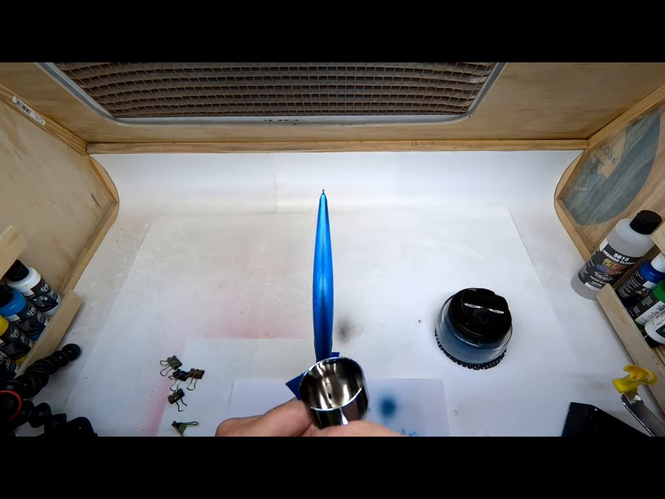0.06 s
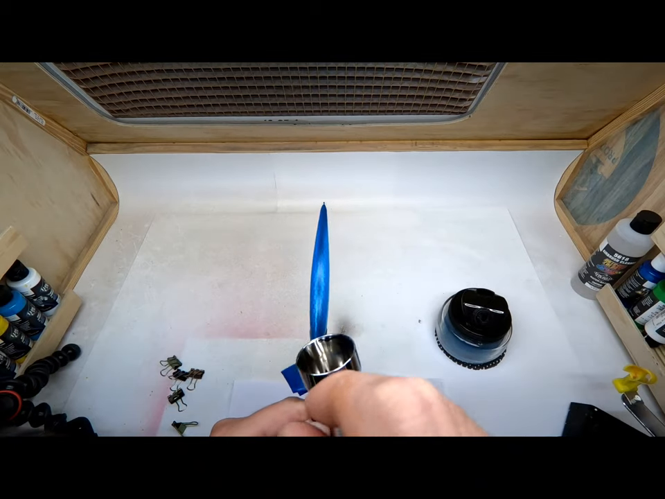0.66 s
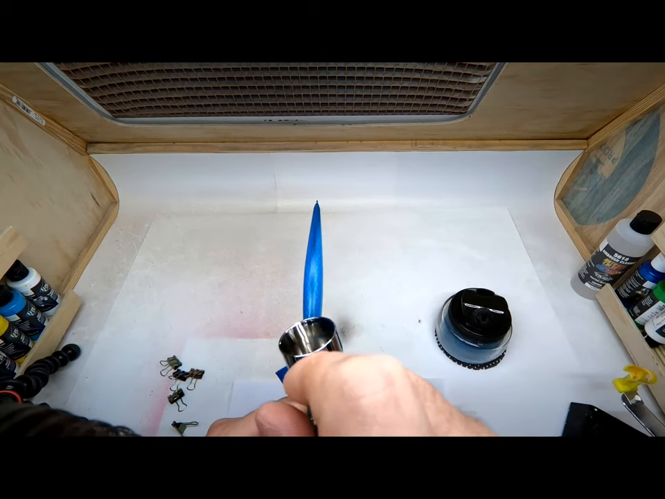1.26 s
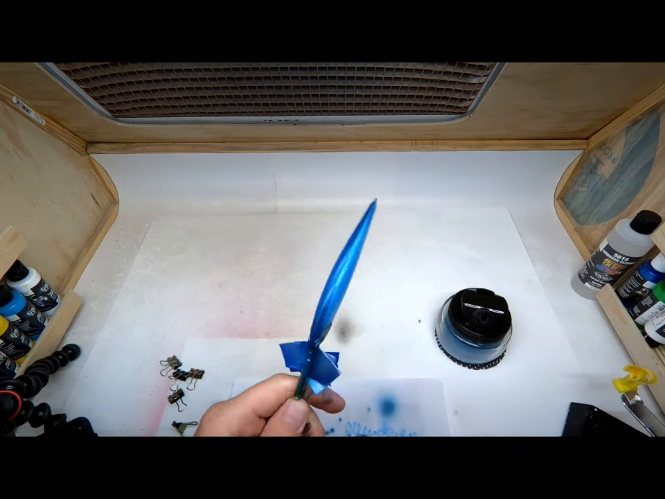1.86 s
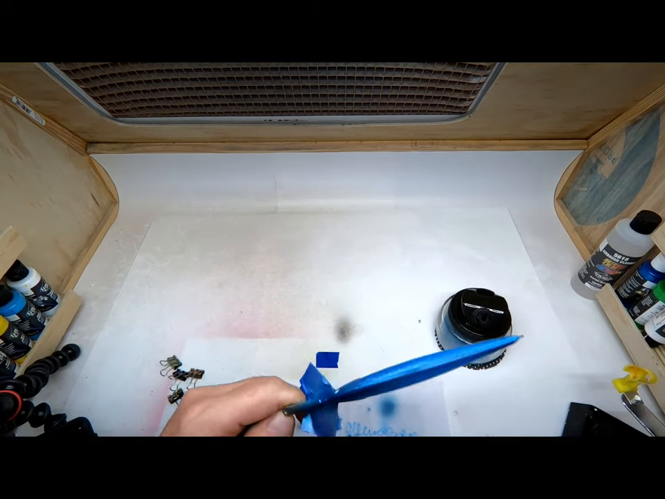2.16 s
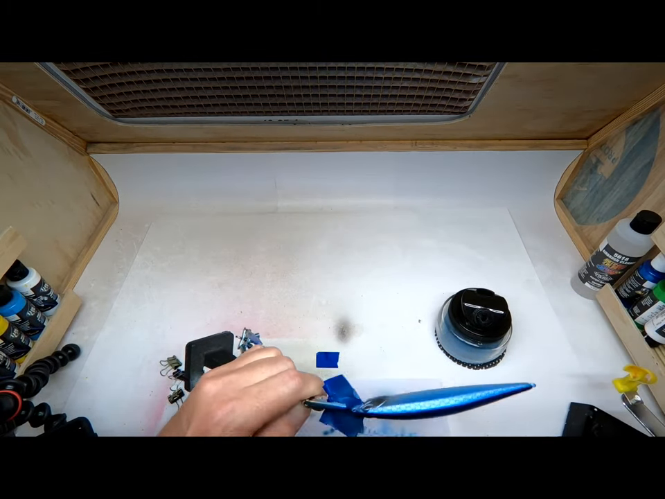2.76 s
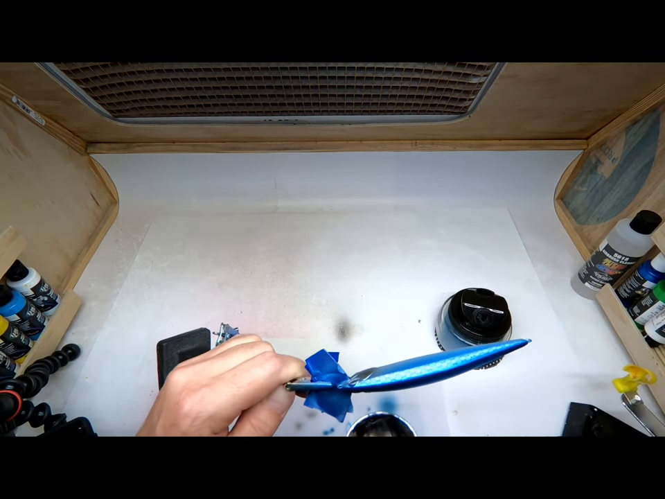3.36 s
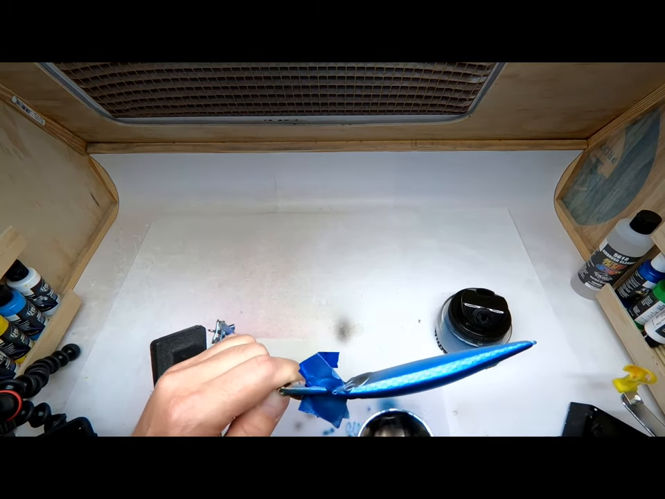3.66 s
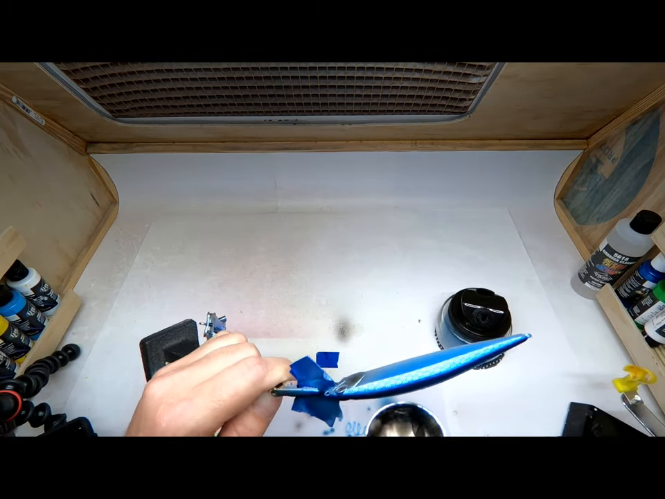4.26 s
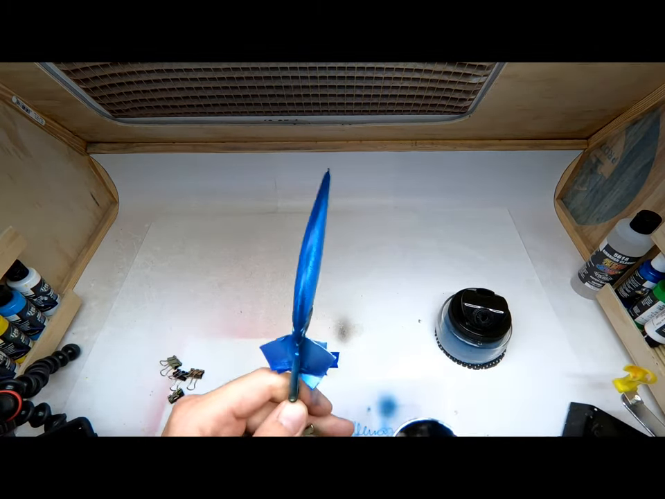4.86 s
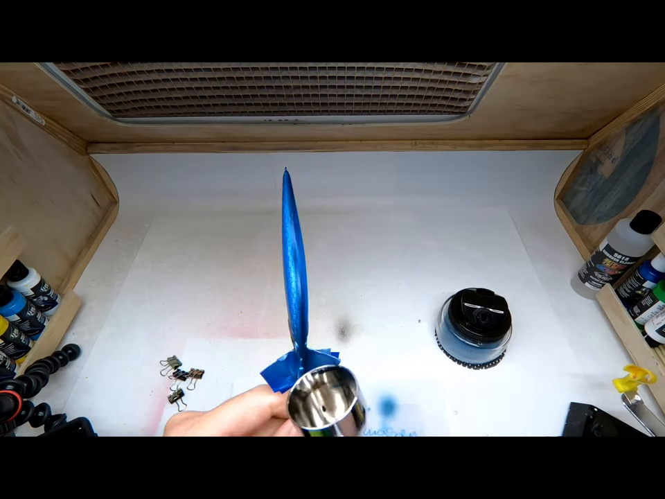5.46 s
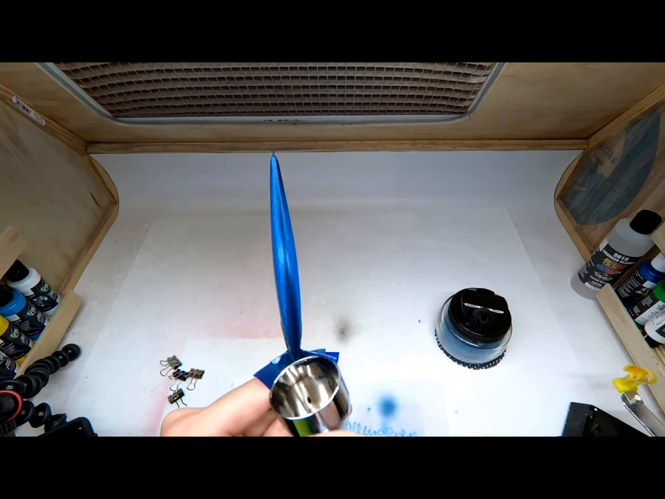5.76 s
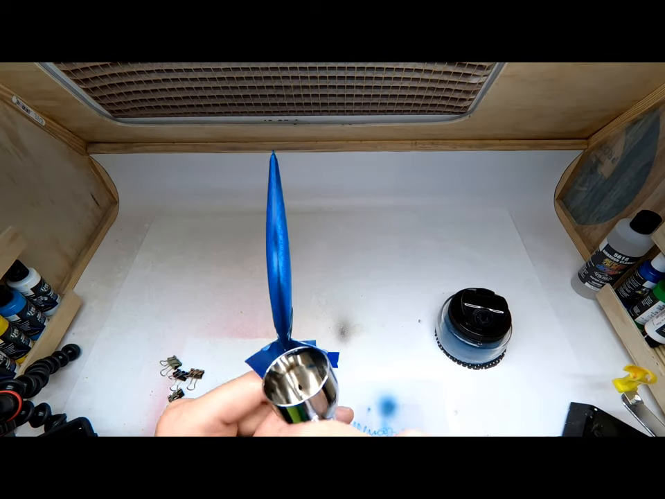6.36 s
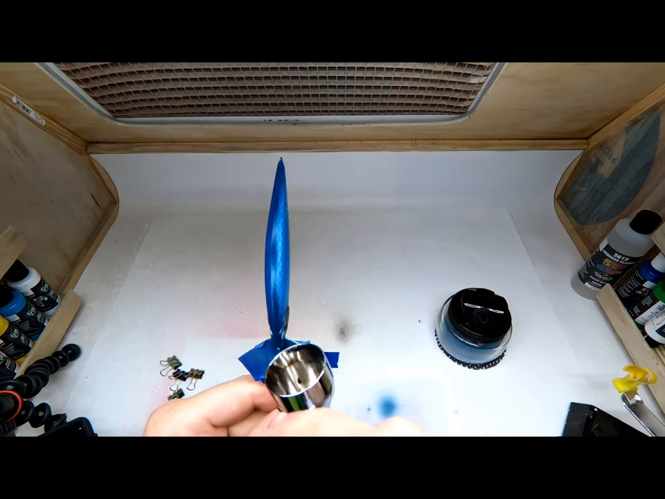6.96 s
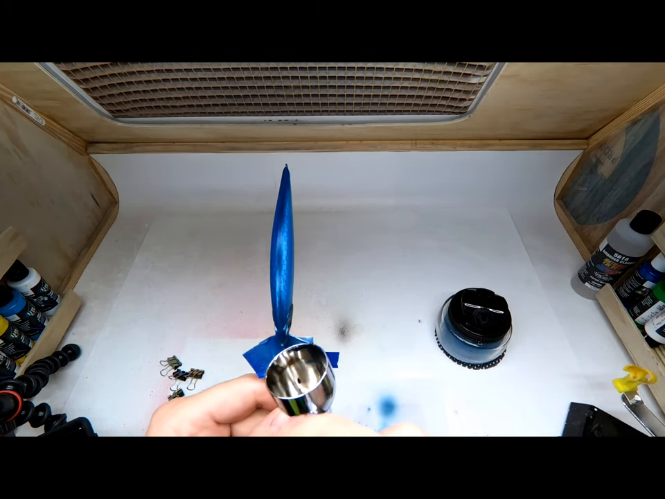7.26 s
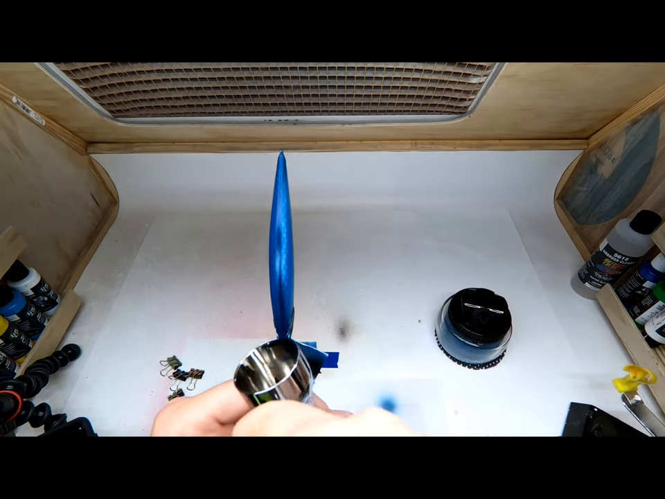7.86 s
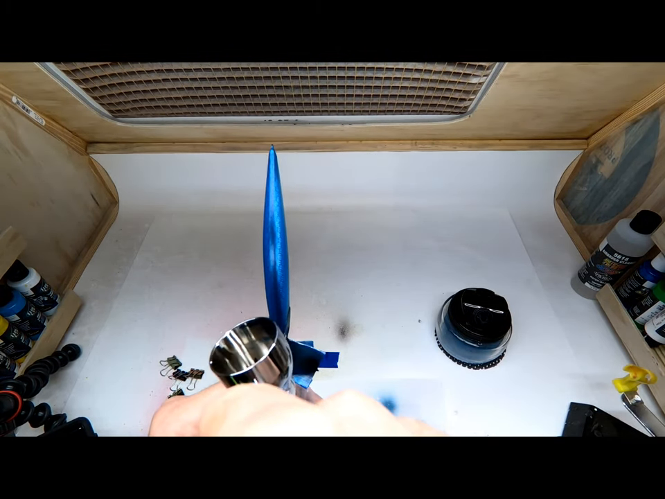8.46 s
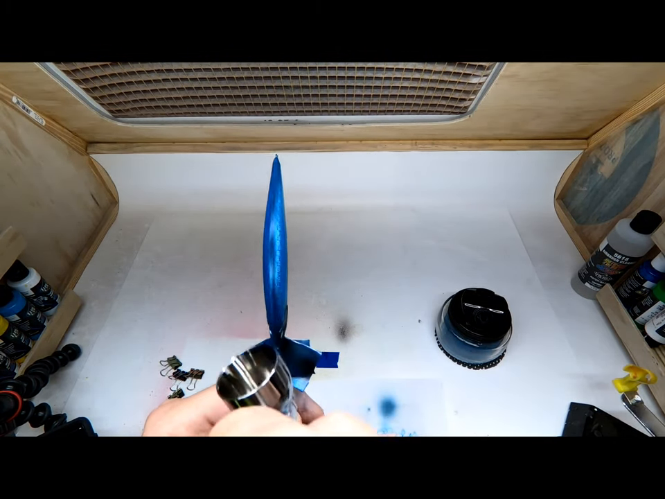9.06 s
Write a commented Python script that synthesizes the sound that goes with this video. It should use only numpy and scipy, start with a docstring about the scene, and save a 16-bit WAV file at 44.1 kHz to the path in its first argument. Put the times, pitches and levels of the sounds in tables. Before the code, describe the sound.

Over the steady low hum of a spray booth fan, a close airbrush hisses and stops. A light tick and a soft bump with a brief rumble follow as the lure is turned. A second short spray comes, then a few small clicks, then a longer spray that surges and sizzles as the jet hits the surface. The sound is in stereo, with a barely audible compressor patter to the right.

```python
"""An airbrush paints a small fishing lure in a plywood spray booth, heard close up in stereo.
Three trigger presses let the nozzle hiss; the sound broadens whenever the jet strikes the lure or hand.
Between them the lure is turned on its holder, with light ticks, faint finger rubs and a short low rumble.
Behind it the extractor fan hums throughout, and a compressor patters faintly right of the microphone."""
import sys
import numpy as np
from scipy.fft import rfft, irfft, next_fast_len
from scipy.io import wavfile
from scipy.ndimage import map_coordinates

SR = 44100
rng = np.random.default_rng(int(sys.argv[2]) if len(sys.argv) > 2 else 0)


def dump_mix(stems):
    """Bounce the given channels to the path in sys.argv[1] as a 16-bit WAV at rate SR."""
    frames = np.atleast_2d(stems).T  # one column per channel
    limited = np.clip(frames, -1, 1)  # hard clip at full scale
    pcm = np.round(limited * 32767).astype(np.int16)
    wavfile.write(sys.argv[1], SR, pcm)


N = 401751

# stereo width of the machines in the background: (frequency [Hz], left-right correlation)
FAR_LIKENESS = [(40, -1.5), (120, 2), (250, 0.58), (500, 0.5), (1200, 0.02), (2300, 0.44), (4300, 0.4),
                (7900, -0.2)]
# stereo width of the jet and the handling up close: (frequency [Hz], left-right correlation)
NEAR_LIKENESS = [(400, 0.64), (1100, 0.39), (2000, 0.81), (3300, 0.61), (5400, 0.5), (6600, 0), (8500, 0.2),
                 (14000, 0.027)]
# their balance at the microphone: (frequency [Hz], left minus right [dB])
NEAR_BALANCE = [(700, 1), (2100, -1), (2800, 2.5), (3700, -1.5), (4800, 2), (5600, -1), (6500, 0.5),
                (7600, 4), (8500, -2.5), (10200, -2.5), (13000, 2.5)]


def amp(db):
    """Decibels to gain."""
    return 10 ** (np.asarray(db) / 20)


def unit(x):
    """Scale to rms 1."""
    return x / np.sqrt(np.mean(x ** 2) + 1e-20)


def along(points, hz):
    """Read (frequency [Hz], value) points on a log axis."""
    freqs, values = np.transpose(points)
    return np.interp(np.log(hz + 1), np.log(freqs + 1), values)


def clock():
    """The time of every sample in seconds."""
    return np.arange(N) / SR


def wobble(rate):
    """A smooth random curve with rate knots a second."""
    return map_coordinates(rng.standard_normal(1024), [clock() * rate], mode="mirror")


def swell(start, end, attack, release):
    """An envelope 0-1 that rises smoothly until start, holds until end and falls away."""
    t = clock()
    ramp = np.clip(1 + (t - start) / attack, 0, 1) * np.clip(1 - (t - end) / release, 0, 1)
    return np.sin(np.pi / 2 * ramp) ** 2


def filtered(x, response):
    """Filter x by a gain that is a function of frequency."""
    size = next_fast_len(N + 8192)
    return irfft(rfft(x, size) * response(np.fft.rfftfreq(size, 1 / SR)), size)[..., :N]


def pan(side_db):
    """Left and right gains of constant total power; positive is left."""
    side_db = np.atleast_1d(side_db)
    gains = amp(np.array([side_db, -side_db]) / 2)
    return gains / np.sqrt(np.mean(gains ** 2, axis=0))


def bell(hz, centre, width, height):
    """The curve of one resonance."""
    return height / (1 + (2 * (hz - centre) / width) ** 2)


def booth(hz):
    """Standing waves between the plywood walls, in dB."""
    # peaks and hollows: (centre [Hz], width [Hz], boost [dB])
    resonances = [(977, 100, 8), (1070, 45, -7.5), (1134, 54, 10), (1552, 130, 7), (1808, 95, 8),
                  (2104, 190, 5), (2350, 60, -7), (2456, 69, 8.5), (2620, 60, 0), (2797, 120, 5.5),
                  (3110, 60, 7.5), (3180, 110, -4), (3690, 70, 6.5), (3920, 190, 5), (4310, 90, 3),
                  (4450, 80, -6), (4580, 100, 6.5), (5400, 230, 3.5), (5840, 120, 1), (6470, 100, 4.5),
                  (7700, 220, 4), (8070, 55, 1)]
    return sum(bell(hz, centre, width, db) for centre, width, db in resonances)


def rush(spectrum, likeness=NEAR_LIKENESS, balance=NEAR_BALANCE, hollow=0):
    """Stereo noise of rms 1; hollow says how strongly it rings the booth."""
    def mid_side(hz):
        angle = np.arccos(np.clip(along(likeness, hz), -1, 1)) / 2
        return np.array([np.cos(angle), np.sin(angle)])

    def colour(hz):
        return amp(along(spectrum, hz) + hollow * booth(hz)) * pan(along(balance, hz))

    mid, side = filtered(rng.standard_normal((2, N)), mid_side)
    return unit(filtered(np.array([mid + side, mid - side]), colour))


def tone(hz, db, side_db, lead, envelope):
    """A stereo tone under a complex envelope; the left side leads by lead radians."""
    phase = 2 * np.pi * (hz * clock() + rng.random()) + np.array([[lead], [0]])
    return pan(side_db) * amp(db) * unit(np.real(envelope * np.exp(1j * phase)))


def waver(rate, steady):
    """A complex envelope: a steady part plus a part that turbulence scatters."""
    return np.sqrt(steady) + np.sqrt((1 - steady) / 2) * (wobble(rate) + 1j * wobble(rate))


def fan_motor(sway_db=-0.67):
    """A firm hum at twice the mains frequency, with weaker tones that waver."""
    # motor hum: (frequency [Hz], level [dB], left minus right [dB], left lead [rad])
    mains_hum = (119.9, -26.9, -4.1, .62)
    # fan and duct tones: (frequency [Hz], level [dB], left minus right [dB], left lead [rad],
    # waver rate [1/s], steady share [0-1])
    fan_tones = [(48.5, -51.5, -6.5, 1.2, 3.4, 0.4), (55.6, -53.5, -3.5, 0, 3, 0.4),
                 (99.6, -50, -3, 0.13, 3.4, 0.5), (301.2, -58, -1, 0.27, 25, 0.2), (355, -63, -2, 0, 9, .3),
                 (455, -56.5, -1.5, -0.43, 22, 0.1), (459.6, -55.7, -1.5, -0.43, 9, 0.7),
                 (718, -56.5, -12, 1.27, 8, 0.88), (837.8, -65, 3, -0.27, 12, 0.5)]
    out = tone(*mains_hum, amp(sway_db * wobble(2.92)))
    for hz, db, side_db, lead, rate, steady in fan_tones:
        out += tone(hz, db, side_db, lead, waver(rate, steady))
    return out


def extractor(rumble_db=-34, air_db=-44, hiss_db=-70, flutter_db=1.5):
    """The duct rumbles around the hum and beats with it; air rushes through the filter."""
    # spectra of the duct, the filter air and a faint hiss: (frequency [Hz], relative level [dB])
    duct_spectrum = [(20, -34), (40, -23), (48, -1.5), (62, -8.5), (77, -1), (88, -6.5), (102, 2.5),
                     (114, 7), (127, -2.5), (145, -6), (165, -14), (300, -25.5), (2000, -120)]
    air_spectrum = [(20, -51.5), (150, -5.5), (300, -0.5), (370, -5.5), (470, -1), (590, -9), (660, -4.5),
                    (800, -11), (1030, -19), (1300, -16), (2100, -23), (3200, -32), (4600, -44.5),
                    (14000, -77.5)]
    hiss_spectrum = [(1000, -59), (3500, 0), (5000, -5), (5600, -2), (6500, -2), (7400, -3.5), (7850, -6.5),
                     (8050, -8), (9500, -18), (11000, -31), (14000, -43.5)]
    # the fan's balance at the microphone: (frequency [Hz], left minus right [dB])
    balance = [(50, 2), (80, -6.5), (105, -1.5), (135, 11.5), (280, -2), (450, -2.5), (650, -5.5),
               (1000, -1.5), (2500, -0.5), (5000, 0), (7300, -4), (9500, 8.5)]
    duct = amp(rumble_db) * rush(duct_spectrum, FAR_LIKENESS, balance)
    air = amp(air_db) * rush(air_spectrum, FAR_LIKENESS, balance)
    hiss = amp(hiss_db + flutter_db * wobble(53)) * rush(hiss_spectrum, FAR_LIKENESS, balance)
    return duct + air + hiss


def compressor(crank_hz=23.97, side_db=-7, jitter_s=0.001):
    """Off to the right, the piston pump's valves puff faintly twice on each turn of its crank."""
    # puffs in one turn: (delay [s], level [dB], half-length [s])
    puffs = [(.0133, -66.5, .0017), (.026, -74.5, .003)]
    # spectrum of a puff: (frequency [Hz], relative level [dB])
    puff_spectrum = [(3000, -30), (5600, -17.5), (6250, 0.5), (7300, -1), (7800, -8.5), (8300, -17.5),
                     (11000, -46)]
    period = 1 / crank_hz
    t = clock() + jitter_s * wobble(crank_hz)
    patter = 0
    for delay, db, half_length in puffs:
        from_peak = (t - delay + period / 2) % period - period / 2
        patter += amp(db) * np.exp(-(from_peak / half_length) ** 2)
    return patter * rush(puff_spectrum, FAR_LIKENESS, [(7000, side_db)])


def handling_rumble(thump_side_db=-7):
    """As the lure is turned: a soft bump, then a deep flutter and a higher one, all towards the right."""
    # the bump: (peak time [s], level [dB], frequency [Hz], rise [s], fall [s])
    thump = (2.18, -20.5, 50, .075, .14)
    # the flutters: (full [s], ebbing [s], attack [s], release [s], level [dB], centre [Hz],
    # width [Hz], left minus right [dB])
    flutters = [(2.38, 2.5, .16, .9, -30, 47, 32, -8), (2.72, 2.96, .3, .28, -33.5, 96, 28, -5)]
    peak, db, thump_hz, rise, fall = thump
    wave = np.sin(2 * np.pi * thump_hz * (clock() - peak))
    out = pan(thump_side_db) * amp(db) * swell(peak, peak, rise, fall) * wave
    for start, end, attack, release, db, centre, width, side_db in flutters:
        noise = rng.standard_normal(N)
        band = unit(filtered(noise, lambda hz: bell(hz, centre, width, 1) * (hz < 2 * centre + width)))
        out += pan(side_db) * amp(db) * swell(start, end, attack, release) * band
    return out


def finger_rubs(attack_s=0.04, release_s=0.054):
    """Each slide of the fingers on the holder is a brief, faint, high hiss."""
    # finger slides: (time [s], level [dB])
    slides = [(1.92, -67), (2.42, -67.5), (2.905, -69), (4.768, -75), (4.93, -71), (5.105, -80)]
    # spectrum of the friction: (frequency [Hz], relative level [dB])
    rub_spectrum = [(1000, -39), (5000, -13), (7200, 3), (9000, -16), (14000, -38)]
    return sum(amp(db) * swell(at, at, attack_s, release_s) for at, db in slides) * rush(rub_spectrum)


def ticks(crack_t60=0.024, tail_db=-9, tail_t60=0.14, scatter_db=2, contact_s=0.0006):
    """Each contact of holder or trigger cracks, rings a few metallic modes and lingers in the booth."""
    # light contacts: (time [s], ring level [dB], crack level [dB])
    contacts = [(1.9892, -54, -47), (2.004, -66, -62), (4.722, -66, -55), (4.783, -57, -50),
                (4.846, -67, -63.5), (5.07, -60, -55), (5.2505, -49, -50.5)]
    # metallic modes: (frequency [Hz], relative level [dB], t60 [s])
    metal_modes = [(2430, -5, .025), (3130, -17, .03), (3670, -10, .02), (5220, -2.5, .022),
                   (5530, 0, .026), (5800, -6, .022), (6500, -8, .022), (8500, -20, .02)]
    # spectrum of a hard contact: (frequency [Hz], relative level [dB])
    crack_spectrum = [(800, -12), (1600, -9), (3700, 3), (4600, -5), (5500, 3), (6500, -3), (7800, -9),
                      (8750, -11), (9200, -32), (11000, -59.5)]
    t = np.arange(SR // 4) / SR
    direct, echo = rush(crack_spectrum), rush(crack_spectrum, hollow=1.1)
    onset = 1 - np.exp(-(t / contact_s) ** 2)
    out = np.zeros((2, N))
    for at, ring_db, crack_db in contacts:
        span = slice(round(at * SR), round(at * SR) + len(t))
        ring = 0
        for hz, db, t60 in metal_modes:
            decay = amp(db + scatter_db * rng.standard_normal((2, 1)) - 60 * t / t60)
            phase = 2 * np.pi * (hz * t + rng.random()) + rng.normal(0, 0.56, (2, 1))
            ring += decay * np.sin(phase)
        crack = amp(-60 * t / crack_t60) * direct[:, span]
        tail = amp(tail_db - 60 * t / tail_t60) * echo[:, span]
        out[:, span] += onset * (amp(ring_db) * ring + amp(crack_db) * (crack + tail))
    return out


def valve(on, off, rise, shut_t60=0.077):
    """Air flow of one press, 0-1: it seeps in at 20 dB per rise time and dies quickly once shut."""
    t = clock()
    return amp(-20 * np.maximum(on - t, 0) / rise - 60 * np.maximum(t - off, 0) / shut_t60)


def hose_surge(on, surge_db=5, settle_s=0.17):
    """Gain from stored hose pressure as a press starts; one already under way has none."""
    return amp((on > 0) * surge_db * np.exp(-((clock() - on) / settle_s) ** 2))


def wander(x, drift=0.007, rate=2.5):
    """The resonances slide a little up and down as the hand moves the nozzle about."""
    position = np.cumsum(1 + drift * wobble(rate))
    return np.array([map_coordinates(channel, [position], mode="mirror") for channel in x])


def jet_on_target(attack_s=0.043, release_s=0.023, ramp_share=0.27):
    """Power of the rush off the lure or hand, and the change in dB of the hiss thrown back."""
    # passes of the jet: (on target [s], leaving [s], rush level [dB], hiss change [dB])
    passes = [(0.047, .08, -58.5, 1), (0.733, .93, -61, 0), (.99, 1.05, -54.5, -1), (1.213, 1.242, -56, .8),
              (1.632, 1.657, -60.5, 0), (3.25, 3.28, -63, -2.5), (3.48, 3.576, -61, 0.5),
              (3.97, 4.015, -58, 0), (4.357, 4.385, -52.5, -0.5), (6.11, 6.135, -57.5, -0.5),
              (6.537, 6.986, -48.5, 4.5), (6.58, 6.744, -47.5, -4), (7.15, 7.664, -56, 4),
              (7.415, 7.478, -49.5, -1), (7.55, 7.646, -53.5, 1.5), (7.85, 8.15, -67, 1.5),
              (8.19, 8.223, -53.5, -1.5), (8.36, 8.392, -54, 0.5), (8.466, 8.55, -55, -0.5),
              (8.64, 8.67, -55, -1), (8.736, 8.803, -55, -2), (8.957, 9.02, -54.5, -0.5),
              (9.104, 9.11, -50, 6.5)]
    power, lift_db = 0, 0
    for start, end, db, change_db in passes:
        ease = ramp_share * abs(end - start)  # longer passes are gentler
        hit = swell(start, end, attack_s + ease, release_s + ease)
        power += hit * amp(db) ** 2
        lift_db += hit * change_db
    return power, lift_db


def airbrush(body_db=2, sizzle_db=-2.5, full_hit_db=-46, steepness=0.79,
             flutter_db=0.5, eddy_db=0.5, fizz_lift_share=0.26, fizz_drift_db=1):
    """Up close the free jet hisses high; on a surface it adds a hollow rush that sizzles on a full hit."""
    # trigger presses: (fully open [s], shut [s], rise [s], hiss [dB], grazing rush [dB], fizz [dB],
    # nozzle resonance [Hz], its width [Hz], its boost [dB])
    presses = [(0, 1.68, .02, -56, -72, -59.5, 6450, 300, 1),
               (3.231, 4.408, 0.061, -55, -60, -60, 7200, 650, 6.5),
               (5.341, 9.2, 0.018, -54.5, -63, -57.5, 6700, 400, 1.5)]
    # spectra of the free jet, hiss and fine fizz: (frequency [Hz], relative level [dB])
    nozzle_spectrum = [(300, -60), (900, -20), (2000, -10.5), (4300, -9), (5050, -7), (5350, -4.5),
                       (6300, -1), (7200, -3), (7760, -1), (7970, -3.5), (9000, -14), (9600, -12),
                       (11500, -19), (14500, -26)]
    fizz_spectrum = [(2000, -63), (6000, -22), (8500, 0), (9800, 0.5), (11500, -2.5), (13000, 1.5),
                     (14500, -0.5)]
    # spectra of the jet on a surface, body and sizzle: (frequency [Hz], relative level [dB])
    body_spectrum = [(60, -52), (300, -2.5), (850, 1), (1100, -0.5), (1600, 0), (2400, -3), (3300, -5),
                     (4600, -9), (6000, -10.5), (8300, -16), (14500, -44)]
    sizzle_spectrum = [(1000, -40), (3300, -9), (4600, -4), (5500, 1), (6400, 0.5), (6700, -21), (8300, -3),
                       (10500, -26), (12000, -35), (14500, -42)]
    hit_power, lift_db = jet_on_target()
    jet = amp(lift_db) * wander(rush(nozzle_spectrum, hollow=0.51), drift=0.004)
    fizz = amp(fizz_lift_share * lift_db + fizz_drift_db * wobble(11)) * rush(fizz_spectrum)
    body = amp(body_db) * wander(rush(body_spectrum, hollow=1.14))
    sizzle = amp(sizzle_db) * wander(rush(sizzle_spectrum, hollow=0.9))
    eddies = amp(eddy_db * wobble(35))
    out = np.zeros((2, N))
    for on, off, rise, hiss_db, graze_db, fizz_db, peak_hz, width_hz, boost_db in presses:
        # each grip aims the nozzle differently and favours another pitch of its hiss
        hiss = amp(hiss_db) * filtered(jet, lambda hz: amp(bell(hz, peak_hz, width_hz, boost_db)))
        strike = np.sqrt(amp(graze_db) ** 2 + hit_power)
        # the sizzle grows faster than the body as the jet meets the surface squarely
        brightness = (strike / amp(full_hit_db)) ** steepness
        splash = eddies * strike * (body + brightness * sizzle)
        # splash and fizz need full flow, so they come in last
        flow = valve(on, off, rise)
        out += flow * hose_surge(on) * (hiss + flow * splash) + flow ** 2 * amp(fizz_db) * fizz
    return amp(flutter_db * wobble(60)) * out


def scene():
    """At the booth: machines behind, the handling and the airbrush in front."""
    machines = fan_motor() + extractor() + compressor()
    handling = handling_rumble() + finger_rubs() + ticks()
    return machines + handling + airbrush()


def record(dry):
    """The microphone passes nothing above its band limit."""
    top_hz, edge_hz = 14560, 150
    return filtered(dry, lambda hz: np.clip((top_hz - hz) / edge_hz + 0.5, 0, 1))


dry = scene()
out = record(dry)
dump_mix(out)
```